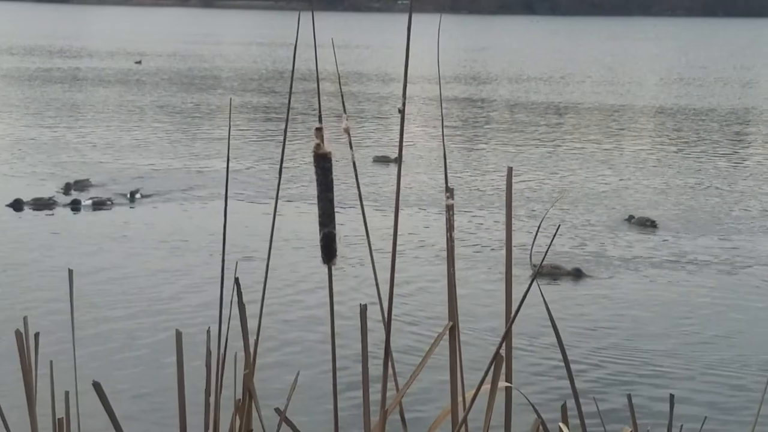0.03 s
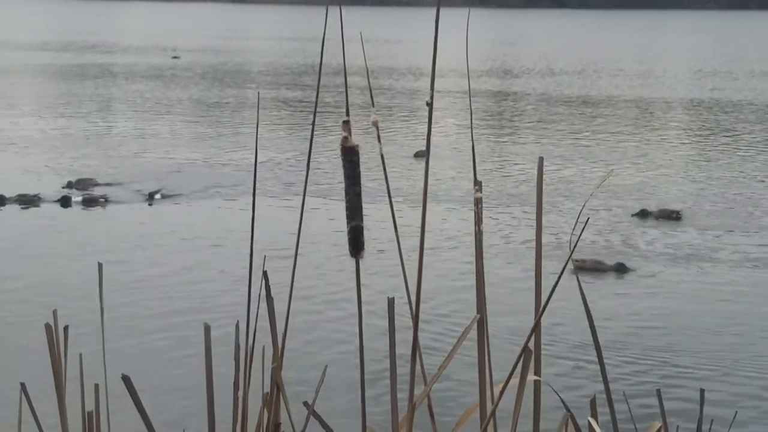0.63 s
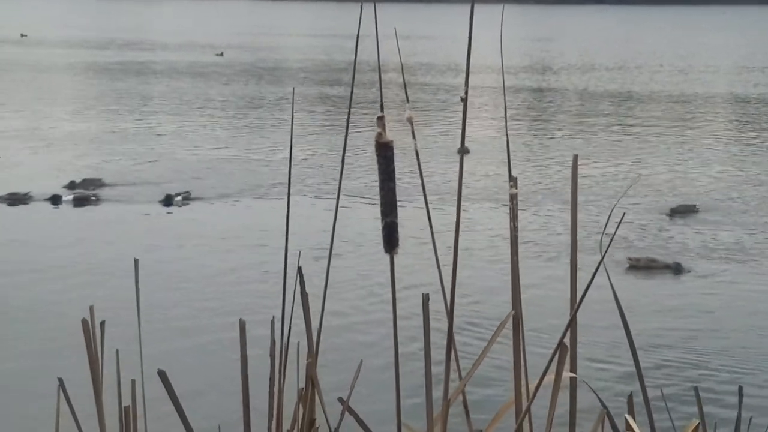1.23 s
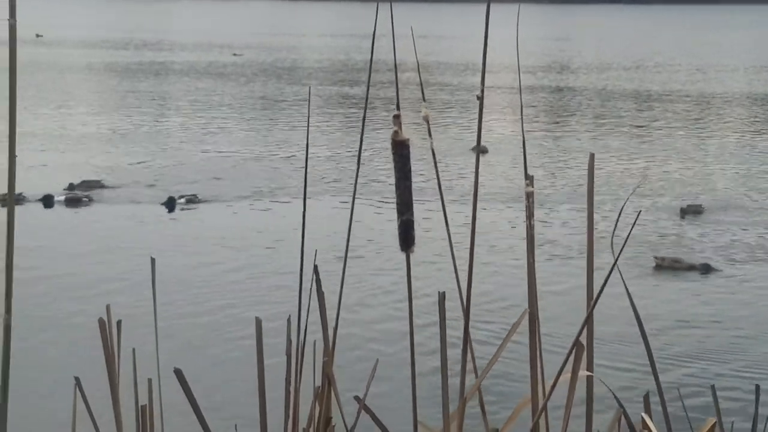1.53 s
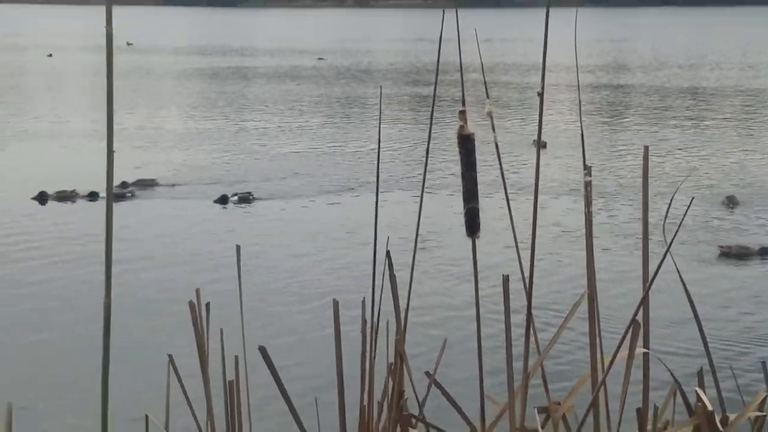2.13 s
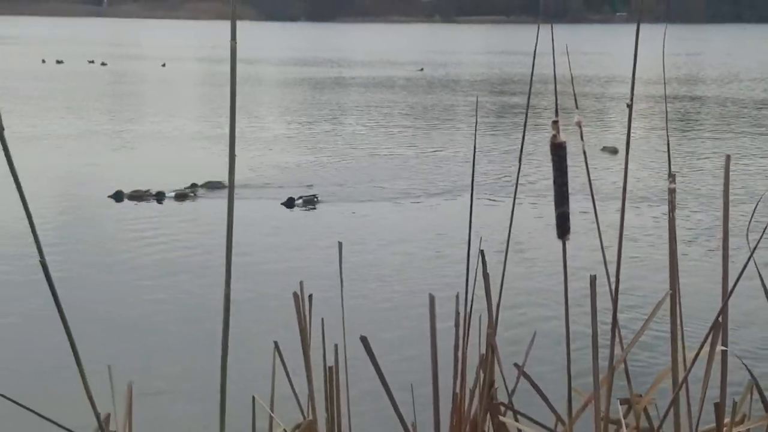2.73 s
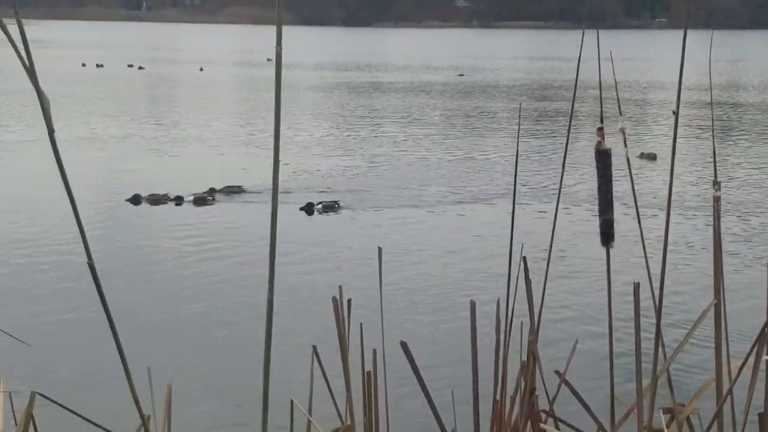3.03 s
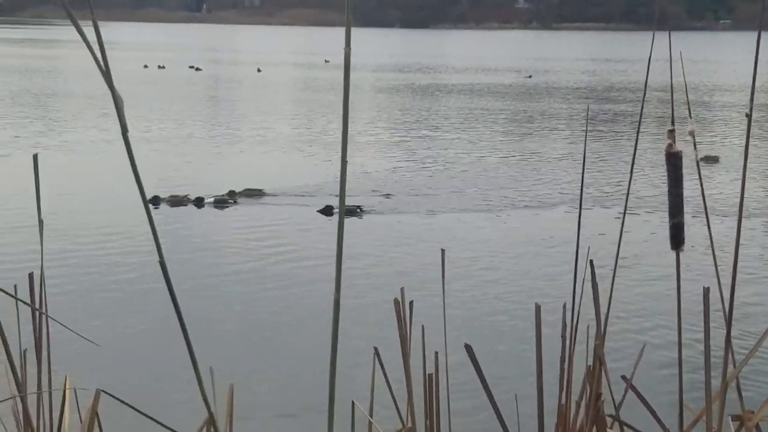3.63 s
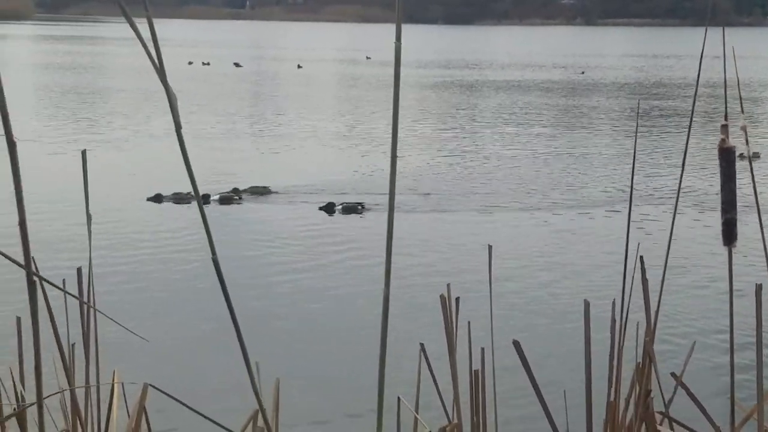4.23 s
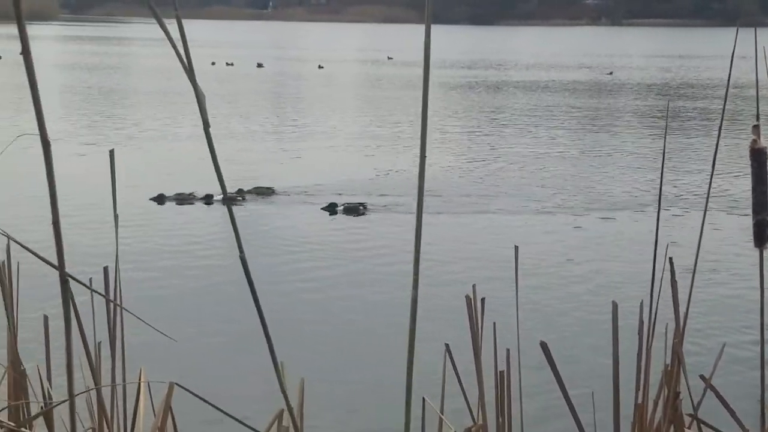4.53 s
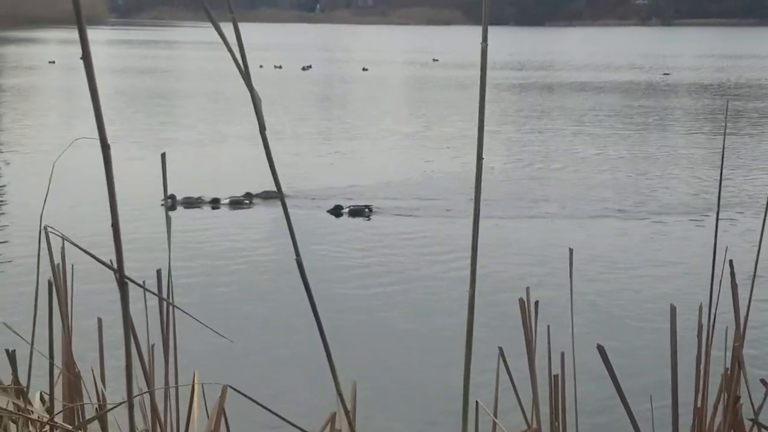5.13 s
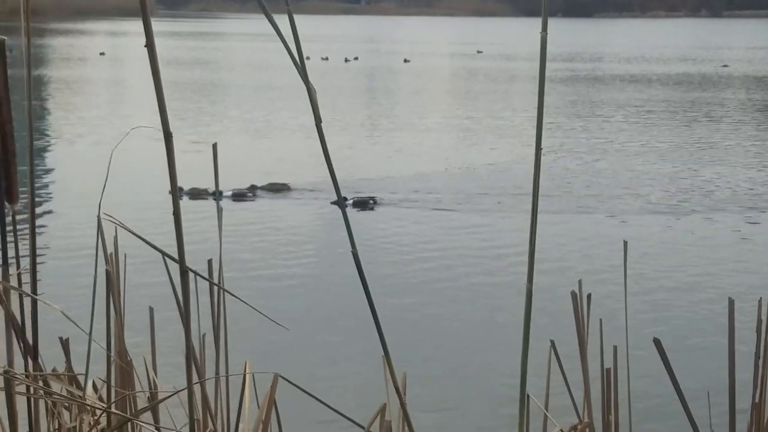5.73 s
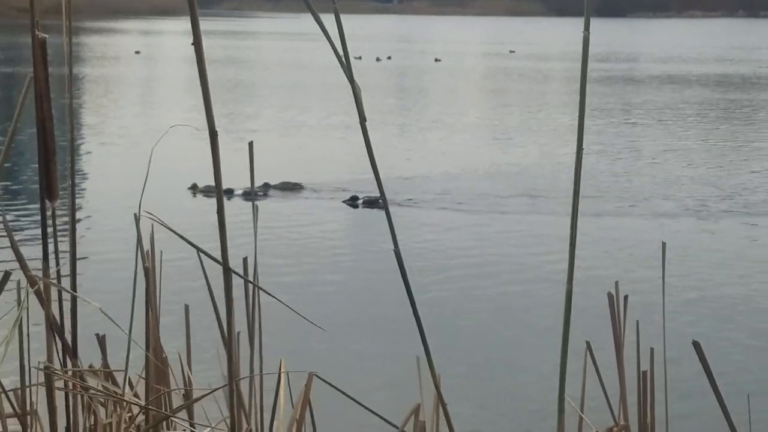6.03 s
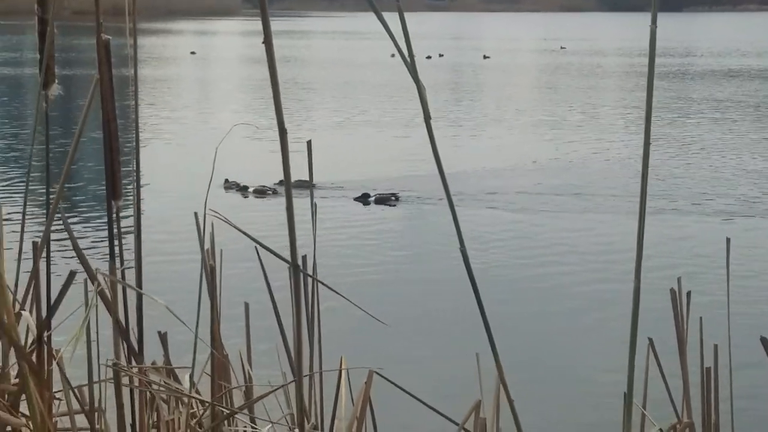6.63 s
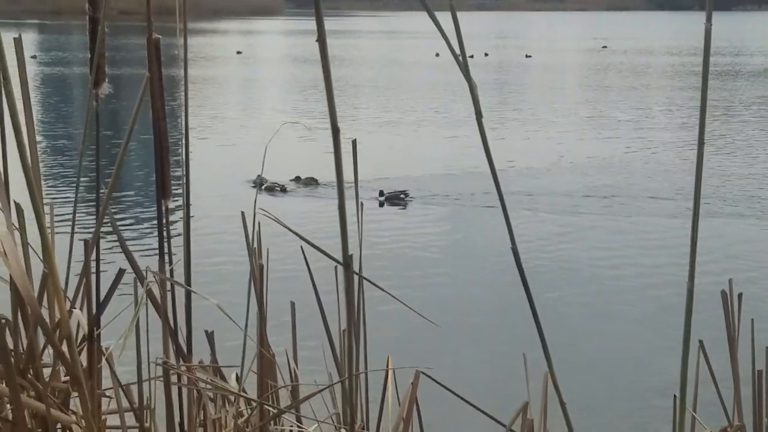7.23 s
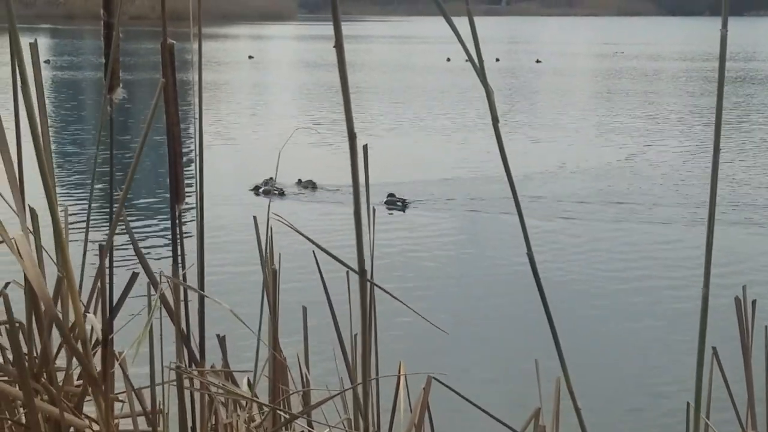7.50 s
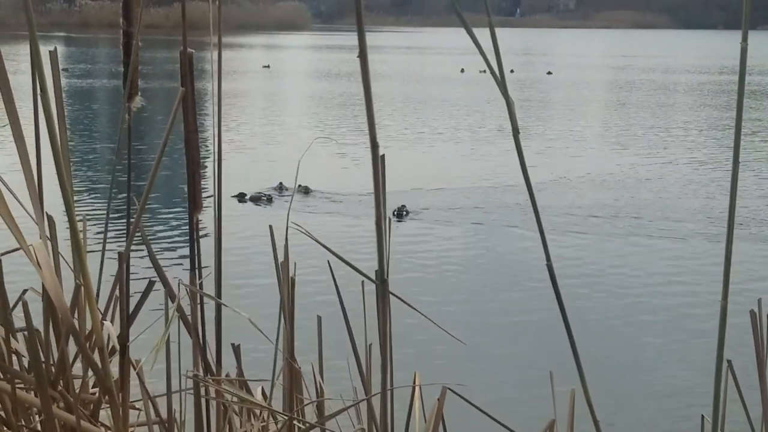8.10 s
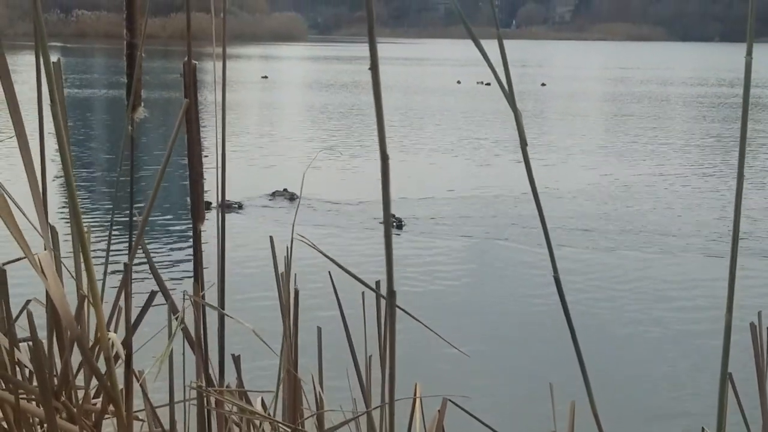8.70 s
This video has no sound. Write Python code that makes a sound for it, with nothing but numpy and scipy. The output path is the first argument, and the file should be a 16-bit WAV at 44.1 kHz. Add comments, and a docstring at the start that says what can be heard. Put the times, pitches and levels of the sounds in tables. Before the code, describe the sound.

Faint, scattered ticks of dry reed leaves over the constant low rumble and tyre roar of a faraway road.

```python
"""A busy road far off to the right, heard across a lake from a reed bed on the shore.
Traffic blurs into engine rumble and tyre roar; a few engines drone through, with faint overtones.
Close by, dry reed leaves slip and tick faintly in a light breeze, over a soft hiss.
The hand-held microphone pair turns slowly, shifting the road's lag and balance."""
import sys
import numpy as np
from scipy import signal
from scipy.fft import rfft, irfft
from scipy.io import wavfile
from scipy.ndimage import uniform_filter1d

SR = 44100
rng = np.random.default_rng(int(sys.argv[2]) if len(sys.argv) > 2 else 0)


def log_audio(samples):
    """Write samples as a 16-bit WAV file to the path given in sys.argv[1]."""
    # one column per channel
    frames = np.atleast_2d(samples).T
    # limit to full scale, then quantise
    limited = np.clip(frames, -1, 1)
    pcm = np.round(limited * 32767).astype(np.int16)
    wavfile.write(sys.argv[1], SR, pcm)


N = 386316
T = np.arange(N) / SR
FRAME = 2048

# road spectrum at the shore: (frequency [Hz], density [dB/Hz])
ROAD_SPECTRUM = [(27, -100), (52, -63), (100, -56), (145, -57), (290, -59), (510, -66), (660, -61.5),
                 (790, -56), (950, -56), (1200, -59), (1700, -60.5), (2750, -71.5), (3400, -83),
                 (5000, -88)]
# engine rumble: (time [s], level [dB])
RUMBLE_LEVEL = [(0, 0), (3, -0.2), (5, -1), (6.2, -1.3), (7.6, -1.8), (8.76, -1)]
# heavy vehicles swelling the rumble: (peak time [s], sigma [s], rise [dB])
LORRY_SWELLS = [(1.45, 0.13, 1.4), (4.1, 0.38, 1.4)]
# tyre roar, louder as more traffic comes into the open: (time [s], level [dB])
ROAR_LEVEL = [(0, -0.8), (2.5, -1.1), (3.4, 0.7), (3.9, 0.8), (4.8, 0), (6.2, 1), (7, 1.2), (8.76, 0.1)]
# tyre hiss: (time [s], level [dB])
TYRE_HISS_LEVEL = [(0, 0.5), (1.1, 0.9), (1.8, -1.5), (4.2, -1.5), (5.4, -1.5), (7.8, 0), (8.76, -0.8)]
# breeze in the reeds, also drives reeds() and hiss(): (time [s], stir [dB])
BREEZE_STIR = [(0, 0.84), (2.6, -1.4), (4.7, 2.5), (5.4, -2.5), (6.2, 0), (8.76, -0.3)]
# road at the microphones: (frequency [Hz], coherence [0-1], L-R [dB], base lag of left [ms])
ROAD_STEREO = [(60, 1, -1.5, 0.27), (170, 0.95, -0.5, 0.16), (318, 0.98, -1.5, 0.22), (530, 0.77, -3, 0.22),
               (756, 0.83, -1.1, 0.29), (1310, 0.84, -2, 0.28), (1694, 0.91, -3, 0.33),
               (1960, 0.19, -0.5, 0.31), (2650, 0.83, -1, 0.39), (3160, 0, -2, 0.35),
               (4800, 0.18, -7, 0.31)]
# turn of the hand: (time [s], lag scale [ratio], L-R above the rumble [dB])
HAND_TURN = [(0, 1.085, -1.3), (2.2, 1.02, -0.4), (6.6, 0.79, 0)]


def road(hz, s, rumble_hz=590, hiss_hz=1550, reeds_hz=3100, air_hz=5400,
         breeze_share=0.35, drift_db=0.47, patchy_db=0.57):
    """Far vehicles blur into rumble, roar and hiss that reach the right microphone first."""
    lorries_db = sum(rise_db * swell(s, peak_s, sigma_s) for peak_s, sigma_s, rise_db in LORRY_SWELLS)
    flow_db = along(RUMBLE_LEVEL, s)[0] + lorries_db, along(ROAR_LEVEL, s)[0], along(TYRE_HISS_LEVEL, s)[0]
    rumble_db, roar_db, hiss_db = (db + drift_db * np.interp(s, T, walk(4.46)) for db in flow_db)
    low, high, top = 1 - above(hz, rumble_hz), above(hz, hiss_hz), above(hz, reeds_hz, order=20)
    db = across(ROAD_SPECTRUM, hz)[0] + low * rumble_db
    db += (1 - low - high) * roar_db + (high - top) * hiss_db
    db += top * breeze_share * along(BREEZE_STIR, s)[0]
    db += patchy_db * patches(db.shape, bins=6, frames=24)  # narrow bands of the road rise and sink unevenly
    air_lowpass = 1 / np.sqrt(1 + (hz / air_hz) ** 16)  # treble lost on the long way over the water
    coherence, balance_db, lag_ms = across(ROAD_STEREO, hz)
    coherence = np.clip(coherence, 0, 1)
    lag_scale, turn_db = along(HAND_TURN, s)
    delay = np.exp(-2j * np.pi * hz * lag_ms / 1000 * lag_scale)
    right = noise_frames()
    left = coherence * delay * right + np.sqrt(1 - coherence ** 2) * noise_frames()
    gains = pan(balance_db + (1 - low) * turn_db)
    return to_sound(np.array([left, right]) * gains * undb(db) * air_lowpass)


# single engines: (peak time [s], sigma [s], pitch [Hz], glide [Hz/s], fundamental [dB],
# 2nd harmonic re fundamental [dB])
ENGINE_DRONES = [(1.007, 0.37, 112.3, -1, -34.5, -17), (1.45, 0.36, 177.5, -1, -40, -11.5),
                 (5.25, 1.0, 117.8, -.3, -40.5, -21), (7.2, 0.7, 118.8, 0, -44.5, -21),
                 (6.7, 1.6, 99.6, -1.2, -43.5, -2)]


def engines(waver_hz=1.61, fading_db=2.1, rolloff_db_per_octave=-8.5, pan_db=-1.8, harmonics=5):
    """Each drone swells and sinks into the rumble; moving air fades its harmonics unevenly."""
    out = np.zeros(N)
    for peak_s, sigma_s, hz, glide_hz_per_s, db, second_db in ENGINE_DRONES:
        pitch_hz = hz + glide_hz_per_s * (T - peak_s) + waver_hz * walk(7)
        phase = 2 * np.pi * np.cumsum(pitch_hz) / SR
        envelope = np.sqrt(2) * swell(T, peak_s, sigma_s)
        for k in range(1, harmonics + 1):
            harmonic_db = second_db + rolloff_db_per_octave * np.log2(k / 2) if k > 1 else 0
            out += envelope * undb(db + harmonic_db + fading_db * walk(8.2)) * np.sin(k * phase)
    return pan(pan_db)[:, None] * out


# upper harmonics of a distant engine: (peak time [s], sigma [s], pitch [Hz], level [dB])
ENGINE_OVERTONES = [(3.9, 0.8, 399, -51), (4.5, 1.5, 498, -53.5), (7.3, 0.89, 394, -50),
                    (8.7, 0.35, 292, -48.5)]


def engine_overtones(waver_hz=2.39, fading_db=3.0, pan_db=-1.5):
    """Upper harmonics of a distant engine sing faintly, wavering and fading in and out."""
    out = np.zeros(N)
    for peak_s, sigma_s, hz, db in ENGINE_OVERTONES:
        phase = 2 * np.pi * np.cumsum(hz + waver_hz * walk(9)) / SR
        envelope = np.sqrt(2) * swell(T, peak_s, sigma_s)
        out += envelope * undb(db + fading_db * walk(4)) * np.sin(phase)
    return pan(pan_db)[:, None] * out


# clearest leaf ticks: (time [s], level [dB], pitch [Hz], snap re blade [dB])
LEAF_TICKS = [(.366, -52, 7300, -10), (.465, -52, 7900, -14), (.484, -40, 6370, -13),
              (.592, -48, 7000, -22), (.894, -42, 6400, -21), (.98, -48, 7000, -22),
              (1.238, -50, 7300, -14), (1.329, -50, 7700, -12), (1.488, -48, 7200, -24),
              (1.711, -48, 7900, -6), (2.046, -51, 7400, -12), (2.386, -42, 5700, -24),
              (3.195, -50, 6700, -20), (3.74, -51, 6800, -3), (3.897, -51, 6800, -12),
              (4.272, -45, 7200, -26), (4.6, -49, 7700, 0), (4.729, -42, 5000, -24),
              (5.527, -53, 6900, -24), (5.687, -44, 5600, -24), (6.373, -47, 6500, -24),
              (6.553, -50, 6300, -3), (6.756, -39.5, 5450, -16), (6.911, -54, 7800, -1),
              (7.0, -45, 6900, -20), (7.242, -48, 5800, -24), (7.591, -47, 6640, -19),
              (7.666, -48, 7000, -24), (7.75, -52, 6640, 1), (8.125, -45.5, 6900, -24),
              (8.21, -43, 5400, -24), (8.568, -49.5, 7200, 2)]
# uneven treble of the microphones, also in hiss(): (frequency [Hz], L-R [dB])
MIC_BALANCE = [(5900, 0), (6900, 5.5), (8200, -5), (13000, -0.5)]


def reeds(faint_db=-57, spread_db=7, faint_hz=6400, faint_snap_db=-10, breadth_db=3,
          pan_db=-4, scatter_db=3, faint_count=420):
    """Dry leaves tick, a few clearly, many faintly; the microphones' uneven treble pans each by pitch."""
    draws = rng.random((faint_count, 5))
    stirred = np.cumsum(undb(2 * along(BREEZE_STIR, T)[0]))  # faint ticks crowd in the breeze
    times_s = np.interp(draws[:, 0], stirred / stirred[-1], T)
    ticks = [(s, db, hz, snap_db, 0) for s, db, hz, snap_db in LEAF_TICKS]
    for s, (force, breadth, dryness, place) in zip(times_s, 2 * draws[:, 1:] - 1):
        # broader leaves: louder, lower, less snap
        db = faint_db + spread_db * force + breadth_db * breadth
        hz = faint_hz * np.exp(-0.25 * breadth)
        snap_db = faint_snap_db + 9 * dryness - breadth_db * breadth
        ticks.append((s, db, hz, snap_db, scatter_db * place))
    out = np.zeros((2, N + FRAME))
    for s, db, hz, snap_db, place_db in ticks:
        start = int(np.clip(s * SR, 0, N))
        gains = pan(pan_db + place_db + across(MIC_BALANCE, hz)[0])
        out[:, start:start + FRAME] += undb(db) * gains[:, None] * leaf_tick(hz, snap_db)
    return out[:, :N]


def leaf_tick(hz, snap_db, width_hz=1450, attack_s=0.0003, decay_s=0.00056,
              tail_s=0.0084, tail_db=-21, snap_hz=10800, snap_width_hz=7000):
    """A slipping leaf rings its stiff blade under a bright snap; nearby stalks scatter a tail."""
    t = T[:FRAME]
    attack = 1 - np.exp(-t / attack_s)
    decay = np.exp(-t / decay_s) + undb(tail_db) * np.exp(-t / tail_s)
    burst = rfft(rng.standard_normal((2, FRAME)) * attack * decay)
    return ring(burst, hz, width_hz) + undb(snap_db) * ring(burst, snap_hz, snap_width_hz)


def ring(spectrum, hz, width_hz):
    """A burst through a steep resonance, scaled to the energy of 1 ms at 0 dB."""
    f = bin_hz()
    bandpass = 1j * f * width_hz / (hz ** 2 - f ** 2 + 1j * f * width_hz)
    rung = irfft(spectrum * bandpass ** 2)
    return rung / np.sqrt(np.sum(rung ** 2, axis=1, keepdims=True) / (SR / 1000))


# hiss floor: (frequency [Hz], density [dB/Hz])
HISS_SPECTRUM = [(3500, -112), (5600, -104), (6950, -99.8), (8300, -108.5), (9500, -111), (15000, -109)]


def hiss(hz, s, breeze_share=0.4, flicker_db=0.8, patchy_db=1.1):
    """Air, leaves and microphones hiss, uncorrelated left and right, following the breeze."""
    db = across(HISS_SPECTRUM, hz)[0] + breeze_share * along(BREEZE_STIR, s)[0]
    db += flicker_db * np.interp(s, T, walk(30))
    db += patchy_db * patches(db.shape, bins=40, frames=3)
    noise = np.array([noise_frames(), noise_frames()])
    return to_sound(noise * undb(db) * pan(across(MIC_BALANCE, hz)[0]))


def undb(db):
    """Decibels to gain."""
    return 10 ** (np.asarray(db) / 20)


def along(table, s):
    """Table columns interpolated in time."""
    times_s, *columns = np.transpose(table)
    return [np.interp(s, times_s, column) for column in columns]


def across(table, hz):
    """Table columns interpolated in log frequency."""
    points_hz, *columns = np.transpose(table)
    return [np.interp(np.log(hz + 1), np.log(points_hz), column) for column in columns]


def pan(balance_db):
    """Constant-power gains for an L-R level difference."""
    gains = np.array([undb(balance_db / 2), undb(-balance_db / 2)])
    return gains / np.sqrt(np.mean(gains ** 2, axis=0))


def swell(t, peak_s, sigma_s):
    """A vehicle comes and goes: Gaussian bell, peak 1."""
    return np.exp(-0.5 * ((t - peak_s) / sigma_s) ** 2)


def above(hz, edge_hz, order=8):
    """Smooth 0-to-1 step at an edge."""
    return 1 - 1 / (1 + (hz / edge_hz) ** order)


def walk(rate_hz):
    """Random steps smoothed twice, unit deviation."""
    hold = int(SR / rate_hz)
    steps = np.repeat(rng.standard_normal(N // hold + 1), hold)
    smooth = uniform_filter1d(uniform_filter1d(steps, hold), hold)[:N]
    return smooth / smooth.std()


def patches(shape, bins, frames):
    """Random field smoothed in frequency and time, unit deviation."""
    field = uniform_filter1d(rng.standard_normal(shape), bins, axis=0)
    field = uniform_filter1d(field, frames, axis=1)
    return field / field.std()


def bin_hz():
    """Bin frequencies of one frame."""
    return np.arange(FRAME // 2 + 1) * SR / FRAME


def noise_frames():
    """STFT of white noise at 0 dB/Hz."""
    return signal.stft(rng.standard_normal(N) * np.sqrt(SR / 2), SR, nperseg=FRAME)[2]


def to_sound(frames):
    """STFT to samples."""
    return signal.istft(frames, SR, nperseg=FRAME)[1][..., :N]


def scene():
    """Far traffic, near reeds, hiss floor."""
    hz = bin_hz()[:, None]
    s = np.arange(noise_frames().shape[1]) * FRAME / 2 / SR  # frame times
    return road(hz, s) + engines() + engine_overtones() + reeds() + hiss(hz, s)


def record(dry):
    """The recorder's steep low-pass."""
    cutoff_hz = 15850
    return signal.sosfilt(signal.ellip(10, 0.1, 80, cutoff_hz, fs=SR, output="sos"), dry)


dry = scene()
out = record(dry)
log_audio(out)
```